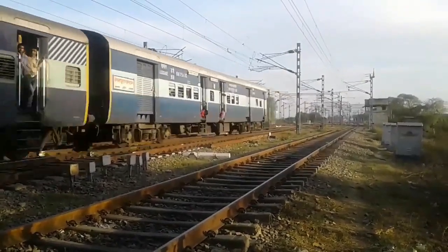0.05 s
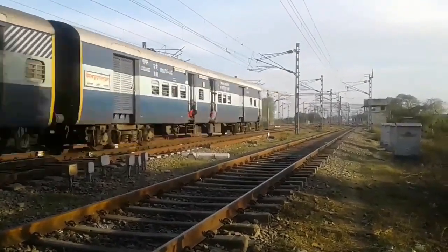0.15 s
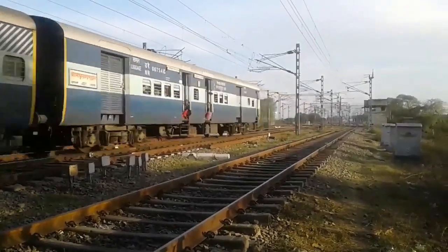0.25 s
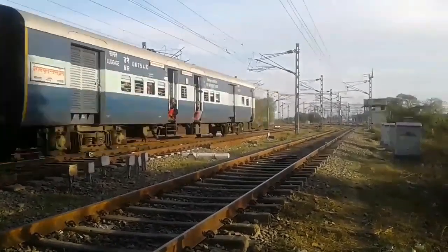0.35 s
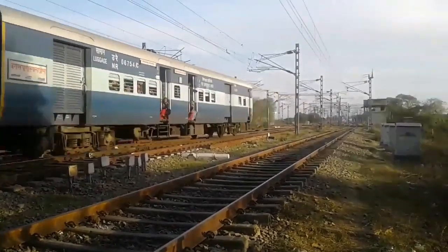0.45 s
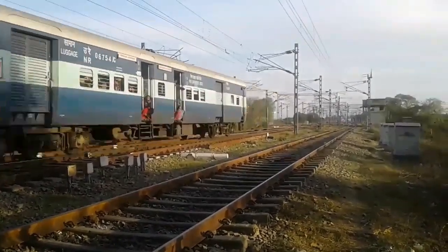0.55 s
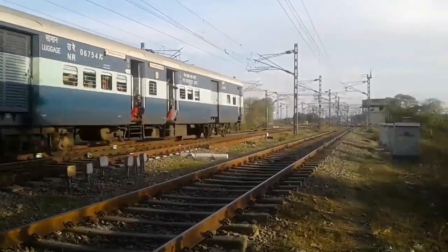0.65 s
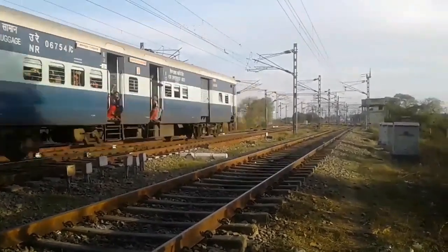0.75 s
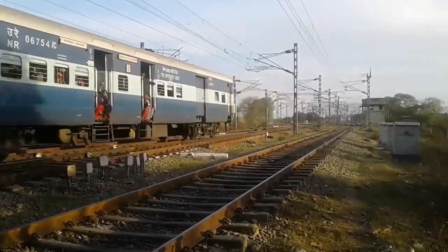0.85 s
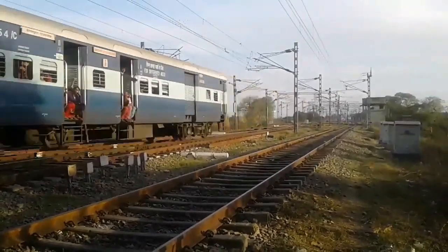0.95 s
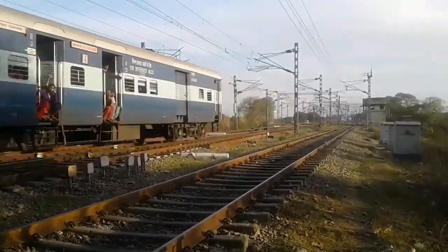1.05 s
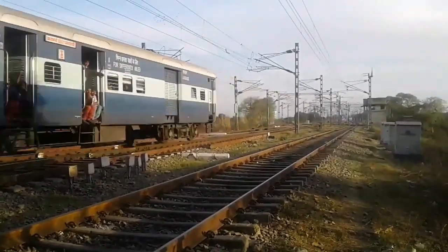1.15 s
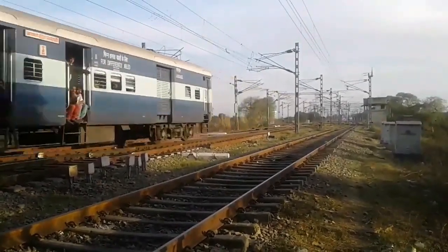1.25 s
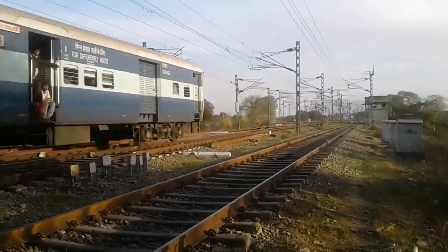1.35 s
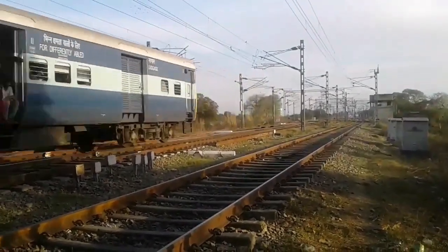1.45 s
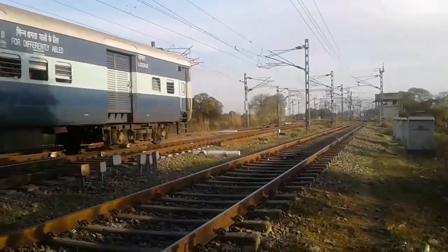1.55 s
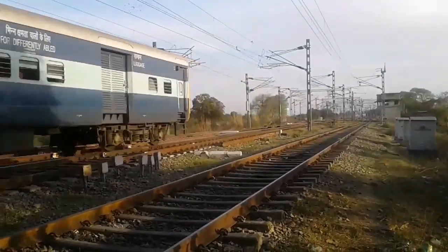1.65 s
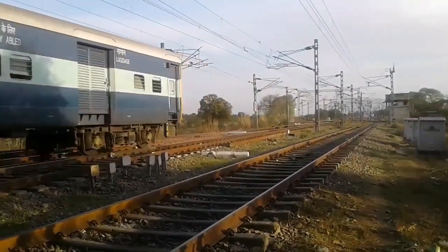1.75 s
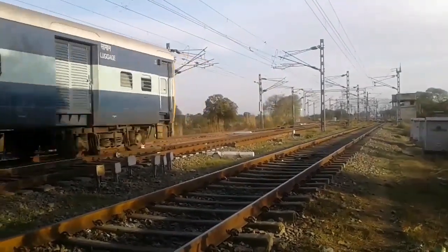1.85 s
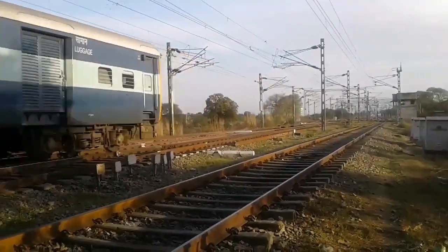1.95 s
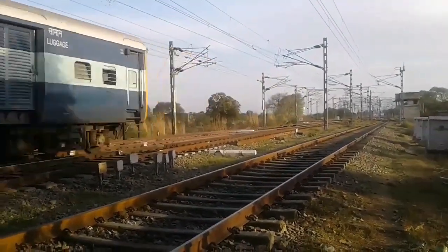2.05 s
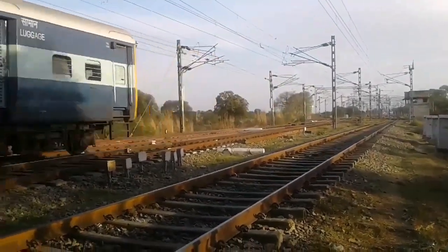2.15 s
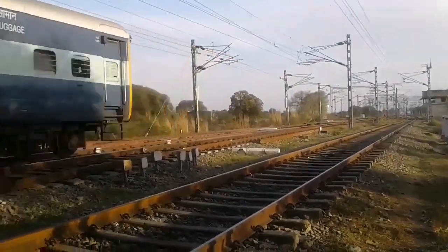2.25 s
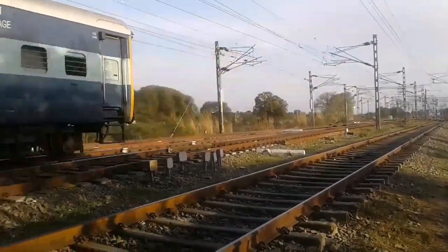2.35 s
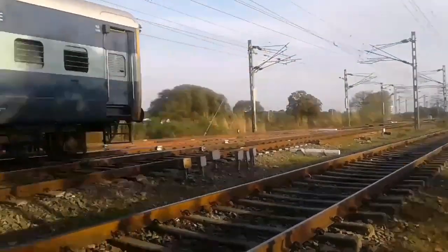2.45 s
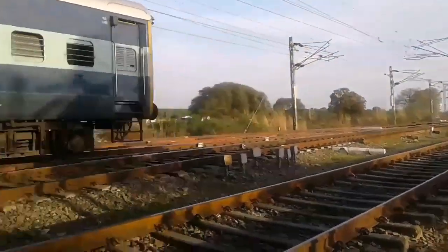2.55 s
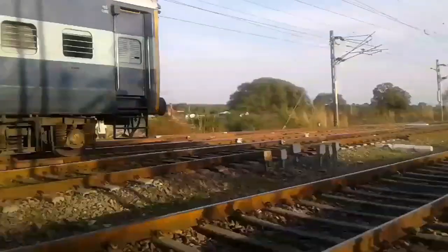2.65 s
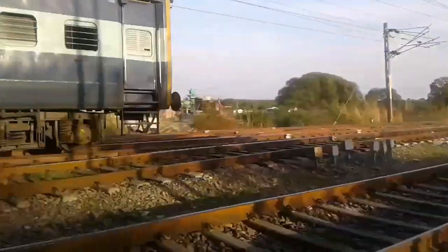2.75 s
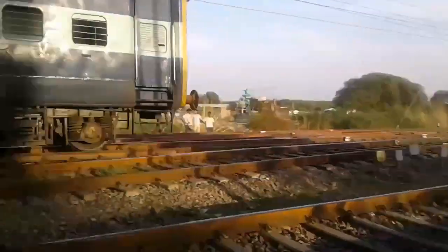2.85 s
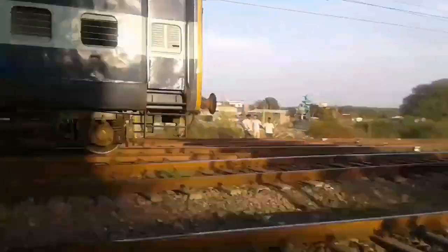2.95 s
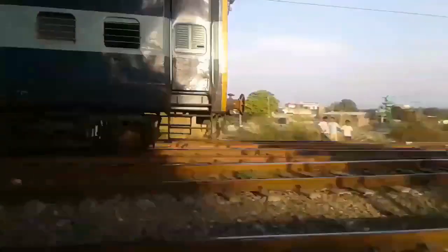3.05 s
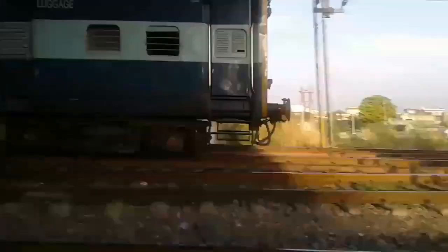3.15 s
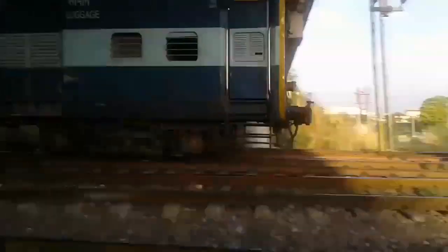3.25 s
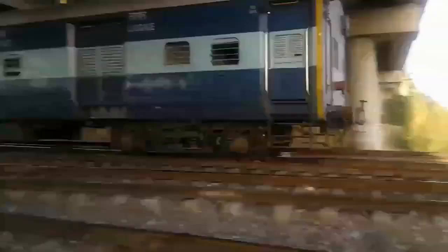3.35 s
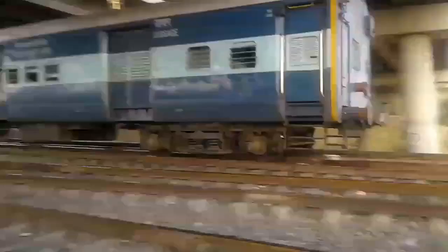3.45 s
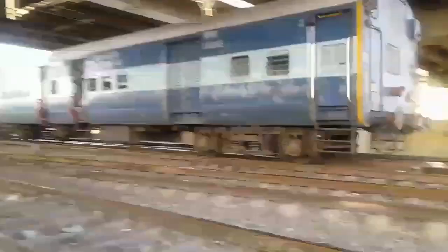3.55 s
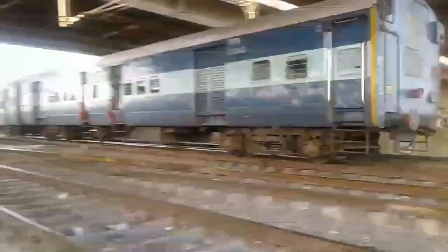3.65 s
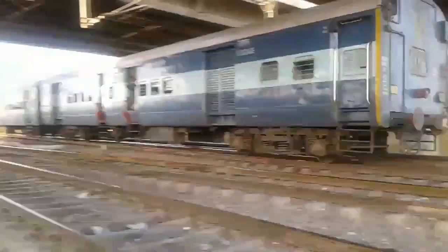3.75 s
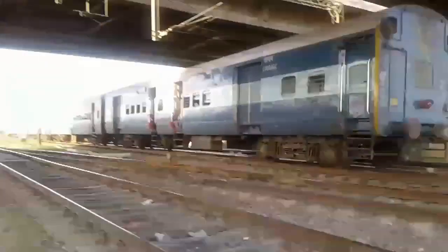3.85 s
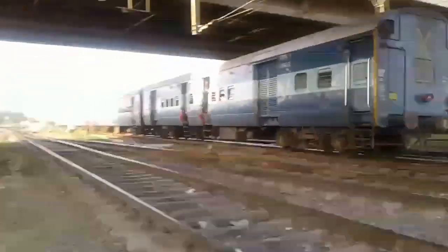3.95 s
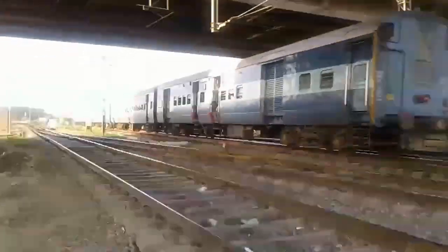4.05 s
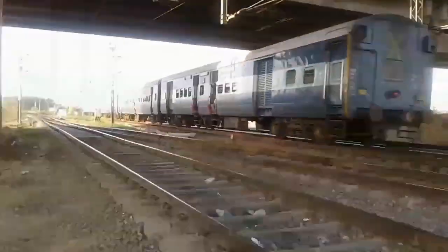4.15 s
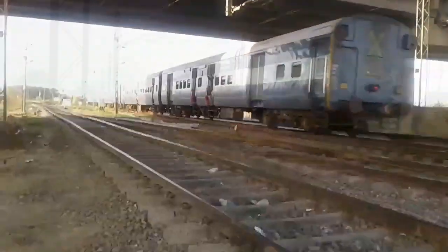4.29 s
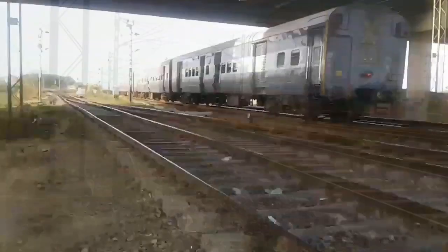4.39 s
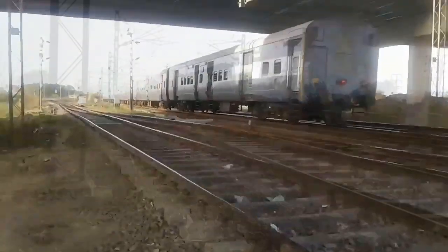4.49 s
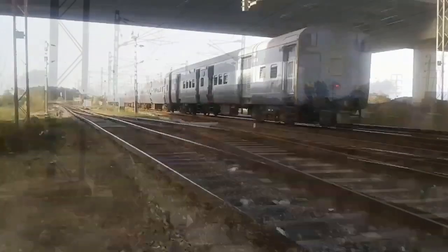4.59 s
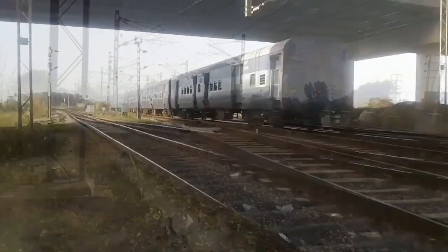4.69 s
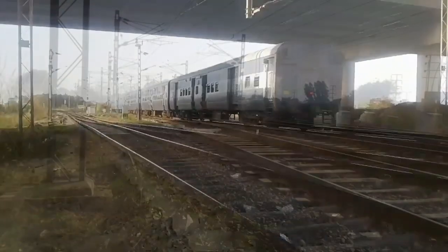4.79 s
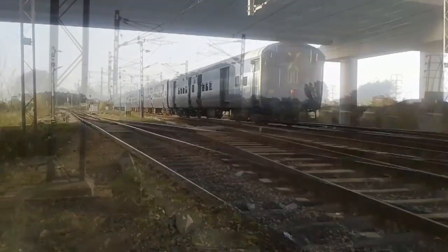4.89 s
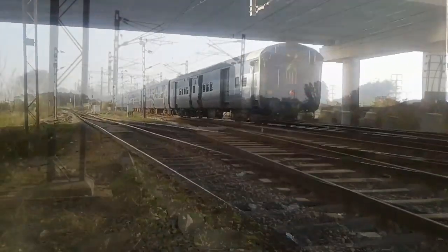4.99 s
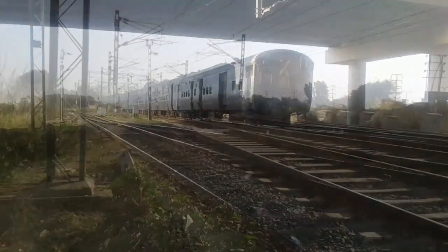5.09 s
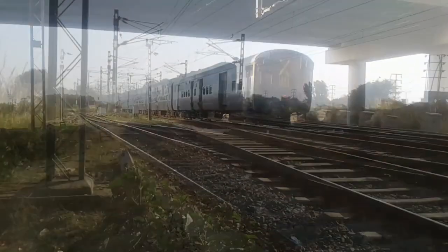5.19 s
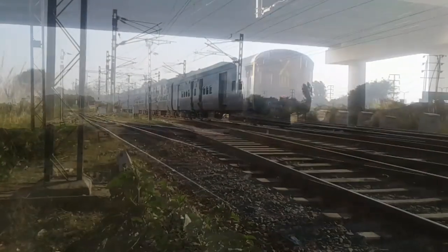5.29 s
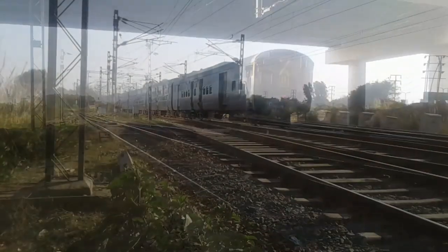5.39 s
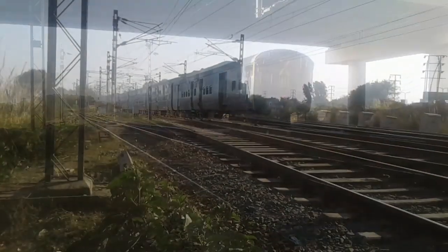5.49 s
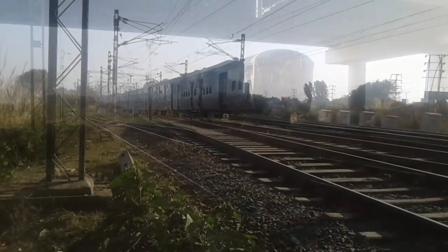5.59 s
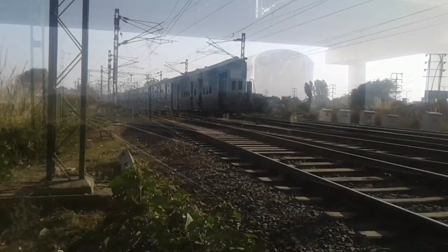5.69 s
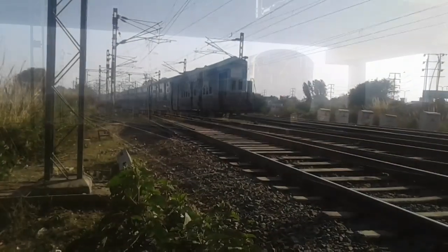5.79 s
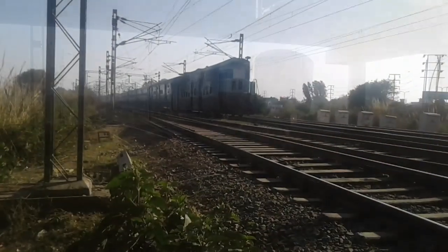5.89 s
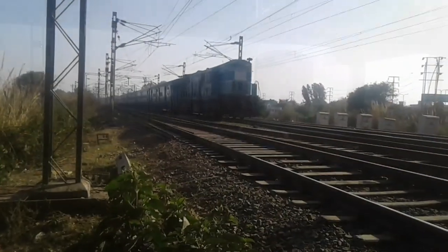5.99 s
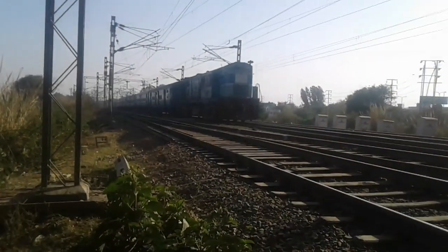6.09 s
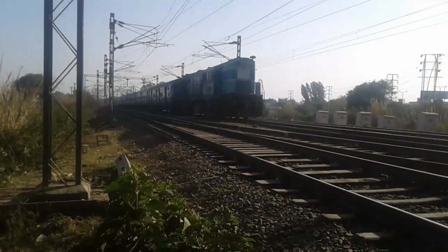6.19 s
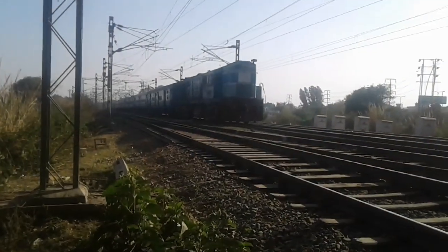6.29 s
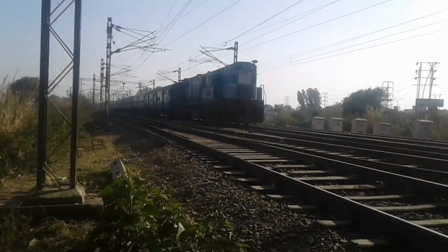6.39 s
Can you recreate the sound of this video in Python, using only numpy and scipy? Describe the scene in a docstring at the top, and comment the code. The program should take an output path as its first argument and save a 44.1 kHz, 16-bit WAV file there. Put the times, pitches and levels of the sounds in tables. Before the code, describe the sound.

Heard from beside the tracks, a passing train rumbles loudly while its steel wheels jolt over a crossing, axle after axle, with knocks, jingling rattles and hard metallic strikes. One wheel sings briefly, and the clatter grows softer and duller as the coaches draw away. It stops abruptly, and after a moment of silence the low drone and faint clatter of a far diesel train approach.

```python
"""Rumble and rattle of a passenger train's last coaches on a crossover a few metres away. Rough treads
make rails roar and coach bodies boom; each bogie jolts twice, axle after axle, shaking its fittings;
wheels crack on the crossing noses and ring; flanges scrape. The train recedes under a road bridge and
the sound cuts off. After a short silence a distant diesel train fades in."""
import sys
import numpy as np
from scipy import signal
from scipy.fft import rfft, irfft, next_fast_len
from scipy.io import wavfile
from scipy.ndimage import map_coordinates

SR = 44100
rng = np.random.default_rng(int(sys.argv[2]) if len(sys.argv) > 2 else 0)


def persist_wave(psi):
    """Save psi, clipped to +-1, as 16-bit WAV."""
    counts = np.round(np.clip(psi, -1, 1) * 32767).astype(np.int16)
    wavfile.write(sys.argv[1], SR, np.atleast_2d(counts).T)


N = 283557
CUT_S, FAR_START_S = 5.196, 5.505
# wheels hitting a crossing nose (time [s], crack [dB], hold [s], wheel ring [dB])
NOSE_STRIKES = [(1.0938, -13.5, .011, -30), (1.3765, -14.5, .008, -32), (1.827, -19, .007, -35),
                (2.1085, -16.5, .008, -33), (3.2618, -14, .007, -32), (3.5412, -13, .005, -21.5),
                (3.9692, -22, .002, -48)]


def amp(db):
    """Decibels to gain."""
    return 10 ** (np.asarray(db) / 20)


def unit(x):
    """x at rms 1."""
    return x / np.sqrt(np.mean(x ** 2) + 1e-20)


def clock():
    """Sample times [s]."""
    return np.arange(N) / SR


def curves(rows):
    """Per-sample curve of each column after the time."""
    times_s, *columns = np.transpose(rows)
    return [np.interp(clock(), times_s, column) for column in columns]


def wobble(rate_hz):
    """Smooth random curve, rate_hz knots a second."""
    return map_coordinates(rng.standard_normal(int(N * rate_hz / SR) + 4), [clock() * rate_hz])


def filtered(x, response):
    """x through a gain over frequency."""
    size = next_fast_len(N + SR // 2)
    return irfft(rfft(x, size) * response(np.fft.rfftfreq(size, 1 / SR)), size)[:N]


def coloured(x, spectrum):
    """x through a spectrum (frequency [Hz], level [dB]), at rms 1."""
    knots_hz, db = np.transpose(spectrum)
    return unit(filtered(x, lambda hz: amp(np.interp(np.log(hz + 1), np.log(knots_hz), db, left=-90))))


def resonant(x, peaks):
    """x through resonances (centre [Hz], width [Hz], level [dB]), at rms 1."""
    def response(hz):
        return sum(amp(db) * 1j * hz * width / (centre ** 2 - hz ** 2 + 1j * hz * width)
                   for centre, width, db in peaks)
    return unit(filtered(x, response))


def noise():
    """White noise."""
    return rng.standard_normal(N)


def contacts(rate_hz, smear):
    """Tiny random impacts in a noise wash of their reflections."""
    return unit(noise() * (rng.random(N) < rate_hz / SR)) + smear * noise()


def burst(start_s, rise_s, hold_s, t60_s):
    """Envelope: rise, hold, decay."""
    t = np.maximum(clock() - start_s, 0)
    return (1 - np.exp(-t / rise_s)) * amp(-60 * np.clip((t - hold_s) / t60_s, 0, 2))


def ring(start_s, modes):
    """Struck steel modes (frequency [Hz], level [dB], t60 [s])."""
    t = np.arange(int(.7 * SR)) / SR
    tone = sum(amp(db - 60 * t / t60_s) * np.sin(2 * np.pi * hz * t) for hz, db, t60_s in modes)
    return np.pad(tone, (round(start_s * SR), N))[:N]


def steely(x, spacing_hz=55, rate_hz=5, depth_db=2.3):
    """Spectral ripple of dense steel modes, shifting as the train goes by."""
    hz, t, spectra = signal.stft(x, SR, nperseg=2048)
    knots = rng.standard_normal((int(hz[-1] / spacing_hz) + 2, int(t[-1] * rate_hz) + 2))
    ripple = map_coordinates(knots, np.meshgrid(hz / spacing_hz, t * rate_hz, indexing="ij"))
    return signal.istft(spectra * amp(depth_db * ripple), nperseg=2048)[1][:N]


def far_train(engine_db=-35, wheels_db=-37, approach_db_per_s=6):
    """A distant diesel rumbles closer, its clatter dulled and smeared by distance."""
    # spectra (frequency [Hz], level [dB])
    engine_spectrum = [(20, -42), (35, -17.5), (55, -2.5), (80, -7.5), (115, 2.5), (160, -5), (250, -8.5),
                       (400, -10), (550, -26), (900, -68.5)]
    wheel_spectrum = [(240, -31), (400, -3), (419, -5.5), (567, 0.5), (723, -2.5), (880, -0.5),
                      (1170, -5.5), (1370, -3), (2150, -6.5), (4460, -14.5), (5350, -13.5), (9960, -43.5),
                      (15000, -57)]
    clatter_spectrum = [(600, -19), (2300, 10.5), (3200, 2.5), (5700, 2), (7200, -8), (10000, -27),
                        (15000, -42.5)]
    # wheels crossing joints (time [s], level [dB], hold [s])
    joints = [(5.65, -39.5, 0.023), (5.913, -31.5, 0.025), (6.12, -34.5, 0.072), (6.181, -37.5, 0.055),
              (6.402, -34, .05)]
    approach_db = approach_db_per_s * (clock() - FAR_START_S) - .1 * wobble(9.2)
    clatter = sum(amp(db) * burst(s, .011, hold_s, t60_s=.3) for s, db, hold_s in joints)
    return (amp(engine_db + approach_db) * coloured(noise(), engine_spectrum)
            + amp(wheels_db + approach_db) * coloured(noise(), wheel_spectrum)
            + clatter * coloured(noise(), clatter_spectrum))


def ground_tremble():
    """The ground shakes under the close train."""
    # tremble (time [s], level [dB])
    levels = [(0, -32.5), (3.2, -36), (4.4, -39)]
    # ground (frequency [Hz], level [dB])
    spectrum = [(18, -35), (30, -18), (45, -3.5), (62, 0), (85, 6.5), (130, -9.5), (250, -43)]
    return amp(curves(levels)[0]) * coloured(noise(), spectrum)


def rolling(roar_db=-1, hiss_db=-2, flutter_db=1):
    """Rough treads make rails and wheels roar and hiss, more so over the points."""
    # rolling noise (time [s], roar [dB], hiss [dB])
    levels = [(0.0, -22, -22), (1.2, -21.5, -29), (1.7, -22, -26), (2.75, -19.5, -25), (3.14, -22.5, -27),
              (3.5, -22, -22.5), (3.99, -24, -23), (4.23, -28.5, -31), (5.02, -30, -32.5),
              (5.06, -27, -32.5)]
    # spectra (frequency [Hz], level [dB])
    roar_spectrum = [(200, -21), (380, 0.5), (480, 3.5), (650, -1), (900, -2.5), (1200, -7), (1600, -15.5),
                     (2400, -14.5), (5000, -51)]
    hiss_spectrum = [(900, -10.5), (1600, 0.5), (2500, 0.5), (3200, -4), (4500, -7), (6500, -13),
                     (8700, -14.5), (10000, -26), (15500, -40.5)]
    roar, hiss = amp(curves(levels))
    flutter = amp(flutter_db * wobble(35))
    treads = steely(contacts(rate_hz=2500, smear=1.6))
    return flutter * (amp(roar_db) * roar * coloured(noise(), roar_spectrum)
                      + amp(hiss_db) * hiss * coloured(treads, hiss_spectrum))


def coach_bodies(rumble_db=-1, boom_db=-2.5, panel_db=-5):
    """Coach bodies boom and their panels drum as the bogies run through the points."""
    # rumble (time [s], level [dB])
    swells = [(0.0, -15.5), (0.49, -14.5), (1.05, -22.5), (1.16, -14), (1.35, -20.5), (1.56, -12),
              (1.78, -16), (2.02, -10), (3.21, -20.5), (3.44, -12.5), (3.53, -19), (3.58, -11),
              (4.09, -17.5), (4.42, -29.5), (5.02, -26.5), (5.15, -26)]
    # a body lurching on its springs (time [s], level [dB])
    lurches = [(.36, -16), (.615, -14.5), (1.12, -20), (3.39, -14.5), (3.555, -23), (4.315, -25.5)]
    # body (frequency [Hz], level [dB])
    spectrum = [(40, -48), (75, -25), (105, -6), (130, -1.5), (165, 1), (205, 0), (250, -2), (320, -1),
                (480, -12), (800, -49)]
    # panel modes (centre [Hz], width [Hz], level [dB])
    panels = [(126, 8.1, -8.5), (158.4, 23, -3), (199.7, 42, -7), (245.8, 17, 2.5), (304, 33, -7.5),
              (434, 35, -18)]
    rumble = amp(curves(swells)[0] + rumble_db)
    lurch = sum(amp(db) * burst(s, rise_s=.02, hold_s=.05, t60_s=.55) for s, db in lurches)
    boom = amp(boom_db) * coloured(contacts(rate_hz=900, smear=1), spectrum)
    drumming = amp(panel_db) * resonant(coloured(noise(), spectrum), panels)
    return np.hypot(rumble, lurch) * (boom + drumming)


def flanges(song_db=5, waver_db=2.5, width_hz=22, closest_s=2.99):
    """Flanges scrape the check rail; rubbed wheels sing faintly as they pass closest."""
    # scrapes (time [s], level [dB], hold [s])
    scrapes = [(0.198, -31, 0.15), (.44, -28, 0.32), (0.846, -26, .1)]
    # scrape (frequency [Hz], level [dB])
    spectrum = [(2200, -24), (3700, -0.5), (4500, 1.5), (5100, -1.5), (6500, -8), (8600, -5.5),
                (10000, -23), (15500, -30)]
    # wheel tones (frequency [Hz], level [dB])
    tones = [(2062, -47), (2589, -40), (2690, -42), (3101, -46), (3316, -49), (3844, -52), (4678, -54)]
    scrape = sum(amp(db) * burst(s, .02, hold_s, t60_s=.19) for s, db, hold_s in scrapes)
    passing = np.exp(-((clock() - closest_s) / .2) ** 2)
    rms = np.sqrt(sum(amp(db) ** 2 for _, db in tones))
    song = rms * resonant(noise(), [(hz, width_hz, db) for hz, db in tones])
    return (scrape * coloured(steely(noise()), spectrum)
            + amp(song_db + waver_db * wobble(22)) * passing * song)


def knocks():
    """Axle boxes bottom out with a short, dull blow."""
    # blows (time [s], level [dB])
    blows = [(.074, -13.5), (.398, -18), (.818, -18), (1.842, -19), (2.266, -18), (2.545, -16.5),
             (3.365, -22)]
    # blow (frequency [Hz], level [dB])
    spectrum = [(250, -18.5), (550, -5.5), (750, 6), (950, 5.5), (1300, -16), (2000, -2), (4000, -36)]
    envelope = sum(amp(db) * burst(s, rise_s=.001, hold_s=.01, t60_s=.16) for s, db in blows)
    return envelope * coloured(noise(), spectrum)


def jolts(axle_gap_s=.285):  # wheelbase over speed
    """One jolt per axle (time [s], clatter [dB], jingle [dB], thud [dB], hold [s])."""
    # bogies crossing a rail gap
    # (time [s], leading axle [dB], trailing axle [dB], jingle offset [dB], thud offset [dB], hold [s])
    bogies = [(0.081, -22, -20.5, -11.5, 4.5, 0.087), (0.525, -22.5, -20, -22.5, 2.5, 0.026),
              (1.099, -25, -27, -9.5, 9.5, 0.075), (1.526, -23.5, -30, -13.5, 2.5, 0.13),
              (1.683, -26.5, -24.5, -11, -2, 0.056), (1.824, -27.5, -26, -6.5, 5, .06),
              (2.238, -25, -24.5, -6, 7.5, 0.12), (3.262, -21, -22.5, -7.5, -0.5, 0.07),
              (3.681, -21.5, -21, -7, -2, 0.077), (4.478, -30.5, -38, -13.5, -6, 0.016),
              (4.624, -31.5, -28.5, -18.5, 11, 0.13)]
    return [(s + delay_s, db, db + jingle_db, db + thud_db, hold_s)
            for s, leading_db, trailing_db, jingle_db, thud_db, hold_s in bogies
            for delay_s, db in ((0, leading_db), (axle_gap_s, trailing_db))]


def clanks(low_hz=800, high_hz=4500, gain_db=-13, t60_s=.3, count=14):
    """Each jolt rings a different set of bogie frame modes."""
    frames = np.zeros(N)
    for s, db, *_ in jolts():
        modes_hz = low_hz * (high_hz / low_hz) ** rng.random(count)
        levels_db = db + gain_db + 2 * rng.standard_normal(count)
        frames += ring(s, zip(modes_hz, levels_db, [t60_s] * count))
    return frames


def singing_wheel(rise_s=.008, drift_hz=3.5, waver_db=1.5):
    """One mode of the last wheel builds, holds while the flange rubs, and dies."""
    # wheel mode (time [s], frequency [Hz], level [dB], hold [s], t60 [s])
    song = (3.969, 1686, -22.5, .17, .55)
    s, hz, db, hold_s, t60_s = song
    phase = 2 * np.pi * np.cumsum(hz + drift_hz * wobble(40)) / SR
    return amp(db + waver_db * wobble(25)) * burst(s, rise_s, hold_s, t60_s) * np.sin(phase)


def ringing(waver_db=2):
    """Struck steel rings on, wavering as the paths over ground and coach side shift."""
    # wheel modes (frequency [Hz], level [dB], t60 [s])
    wheel_modes = [(1174, -9, .5), (1930, 3, .12), (2460, -5, .55), (2530, -5, .5), (3081, 0, .95),
                   (3811, -6, .6), (4651, -4, .35), (5561, -12, .6)]
    # wheels and loose parts (time [s], then for two modes: frequency [Hz], level [dB], t60 [s])
    parts = [(3.8, 8560, -29, .35, 12450, -46, .35), (3.969, 1920, -9, .07, 2030, -17, .06),
             (4.487, 6266, -41, .7, 5582, -46, .4), (4.672, 8560, -34, .12, 5870, -42, .15),
             (4.762, 2293, -28, .25, 5582, -34, .35), (4.925, 2410, -30, .8, 2500, -32, .45)]
    wheels = sum(amp(db) * ring(s, wheel_modes) for s, _, _, db in NOSE_STRIKES)
    clinks = sum(ring(s, [modes[:3], modes[3:]]) for s, *modes in parts)
    return (wheels + clinks + singing_wheel() + clanks()) * amp(waver_db * wobble(45))


def rattles(clatter_db=-1, jingle_db=-1, thud_db=-2, shake_db=.92):
    """After each jolt, brake rigging and springs chatter over a dull thud."""
    # spectra (frequency [Hz], level [dB])
    clatter_spectrum = [(500, -19), (1200, 1), (2000, 5.5), (2600, 6.5), (3100, 3), (4500, 1), (6800, -6),
                        (9000, -9), (10300, -19.5), (15500, -21)]
    thud_spectrum = [(60, -18), (150, 14), (280, -1), (500, 6), (900, 3), (1400, -5), (3000, -62)]
    jingle_spectrum = [(2500, -18), (5500, 13.5), (16000, -3)]
    # bogie fitting modes (centre [Hz], width [Hz], level [dB])
    fittings = [(5870, 130, -4), (7950, 250, -5), (8560, 380, 0), (9050, 400, -9), (11000, 250, -18),
                (12450, 450, -16), (13880, 200, -21)]
    clatter, jingle, thud = np.zeros((3, N))
    for s, db, fittings_db, low_db, hold_s in jolts():
        first_hit = .45 * burst(s, rise_s=.001, hold_s=.012, t60_s=.15)
        clatter += amp(db) * (first_hit + burst(s, .014, hold_s, t60_s=.6))
        jingle += amp(fittings_db) * burst(s, .01, hold_s, t60_s=.6)
        thud += amp(low_db) * burst(s, .0061, .35 * hold_s, t60_s=.87)
    chatter = steely(contacts(rate_hz=1600, smear=1.43)) * amp(shake_db * wobble(70))
    return (amp(clatter_db) * clatter * coloured(chatter, clatter_spectrum)
            + amp(jingle_db) * jingle * resonant(coloured(chatter, jingle_spectrum), fittings)
            + amp(thud_db) * thud * coloured(noise(), thud_spectrum))


def strikes(spray_db=-1, snap_db=2.5, echo_s=.0045, echo_db=-3):
    """A wheel hits the crossing nose: a snap, its quick echo off the ground, a spray of reflections."""
    # spectra (frequency [Hz], level [dB])
    spray_spectrum = [(300, 11), (1000, 10.5), (2000, 10), (4300, 7.5), (6500, 0), (9000, 6.5),
                      (10500, -20.5), (15500, -18.5)]
    snap_spectrum = [(800, -15.5), (2000, 0.5), (6000, -0.5), (9000, 2.5), (10500, -10), (15500, -13)]
    spray, snap = np.zeros((2, N))
    for s, db, hold_s, _ in NOSE_STRIKES:
        spray += amp(db) * burst(s, .0003, hold_s, t60_s=.1)
        for delay_s, gain_db in (0, 0), (echo_s, echo_db):
            snap += amp(db + gain_db) * burst(s + delay_s, rise_s=.0001, hold_s=.0008, t60_s=.008)
    return (amp(spray_db) * spray * coloured(noise(), spray_spectrum)
            + amp(snap_db) * snap * coloured(noise(), snap_spectrum))


def receding(x, corner_hz=7500, shelf_db=-4, span_s=(4.08, 4.3)):
    """The treble fades as the last coach draws away under the bridge."""
    dull = filtered(x, lambda hz: amp(shelf_db * hz ** 4 / (hz ** 4 + corner_hz ** 4)))
    away = np.interp(clock(), span_s, [0, 1])
    return (1 - away) * x + away * dull


def scene(fade_s=.19, fade_power=1.2):
    """The close train's sound cuts off; the distant train fades in."""
    running = ground_tremble() + rolling() + coach_bodies() + flanges()
    impacts = knocks() + ringing() + rattles() + strikes()
    cut = burst(0, rise_s=.00017, hold_s=CUT_S, t60_s=.018) * (clock() < FAR_START_S)
    fade = np.clip((clock() - FAR_START_S) / fade_s, 0, 1) ** fade_power
    return (cut * receding(running + impacts) + fade * far_train())[None]


def record(dry, top_hz=15650):
    """Soft-clip the peaks, then band-limit."""
    rounded = dry[0] / (1 + dry[0] ** 6) ** (1 / 6)
    return filtered(rounded, lambda hz: hz < top_hz)[None]


dry = scene()
out = record(dry)
persist_wave(out)
```